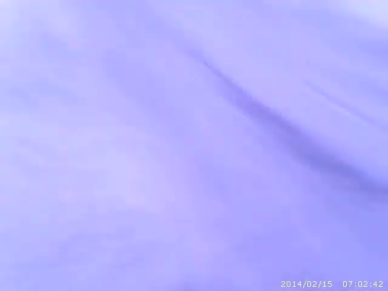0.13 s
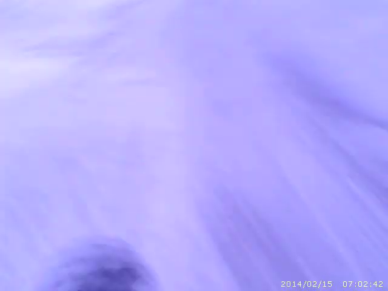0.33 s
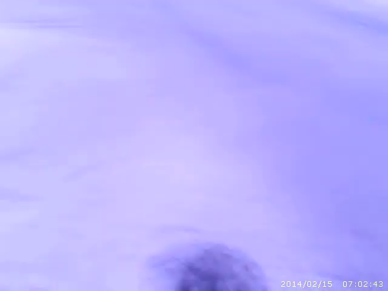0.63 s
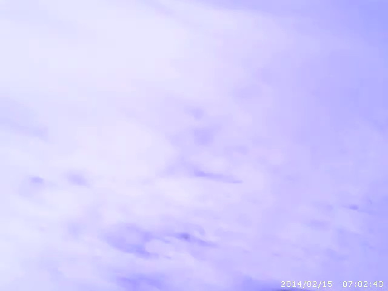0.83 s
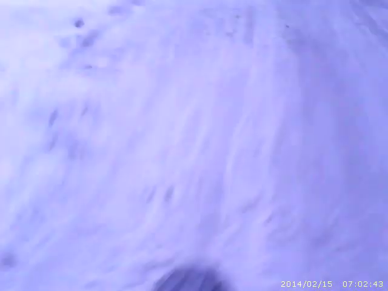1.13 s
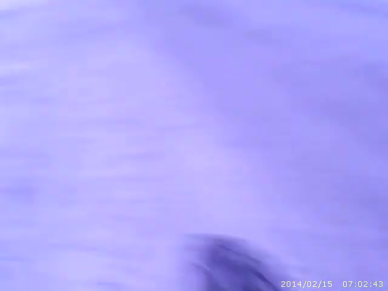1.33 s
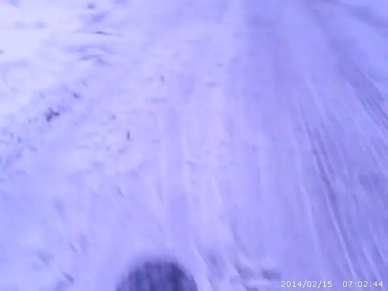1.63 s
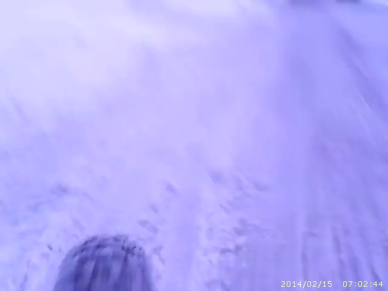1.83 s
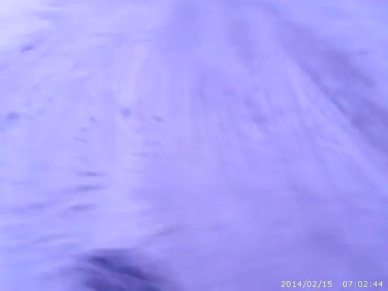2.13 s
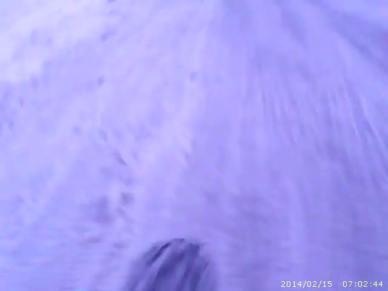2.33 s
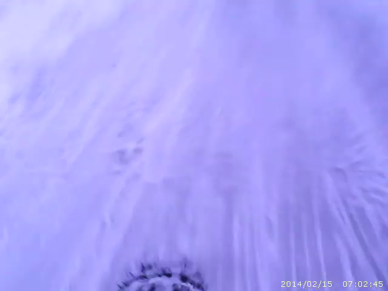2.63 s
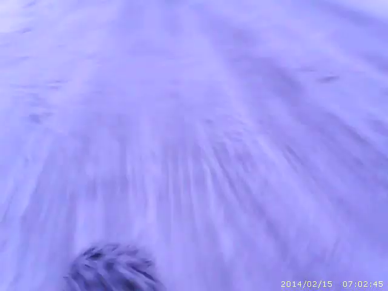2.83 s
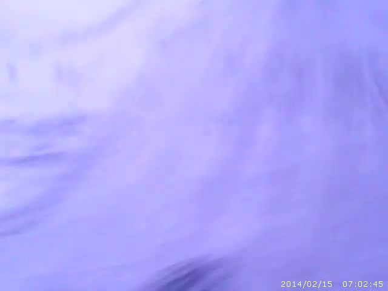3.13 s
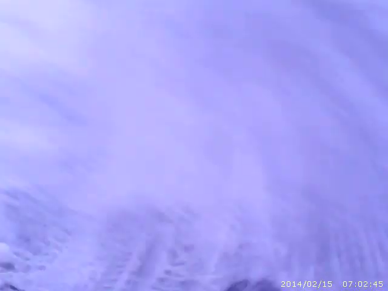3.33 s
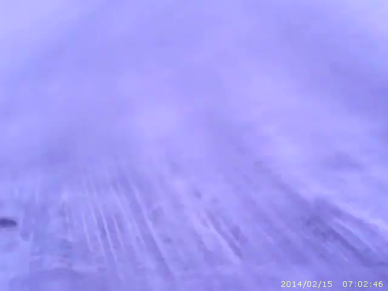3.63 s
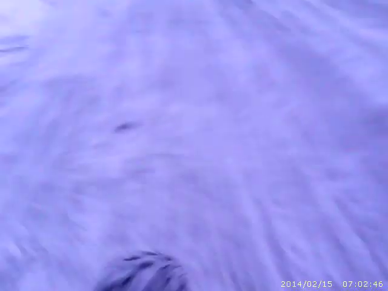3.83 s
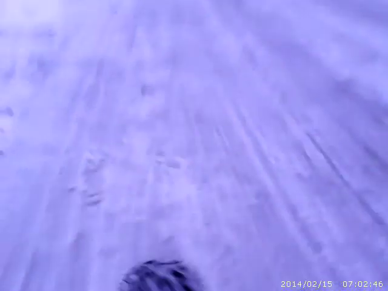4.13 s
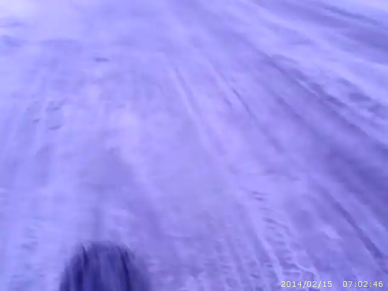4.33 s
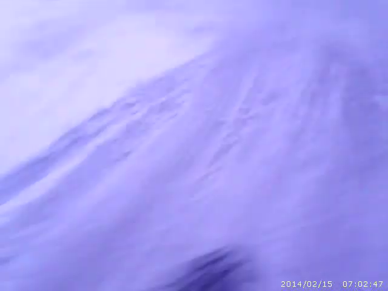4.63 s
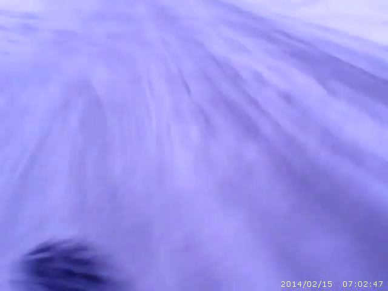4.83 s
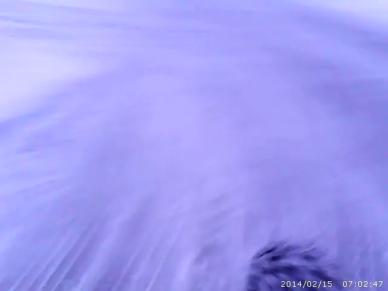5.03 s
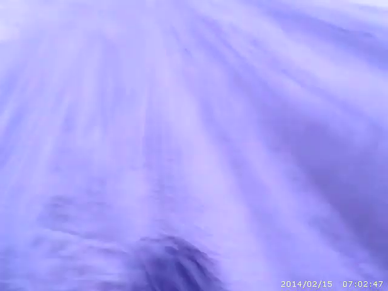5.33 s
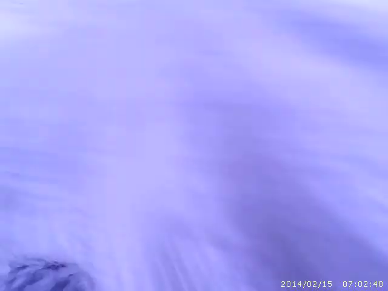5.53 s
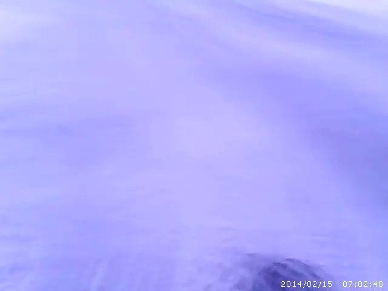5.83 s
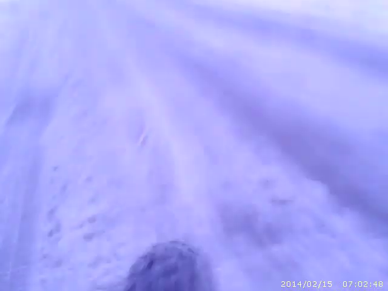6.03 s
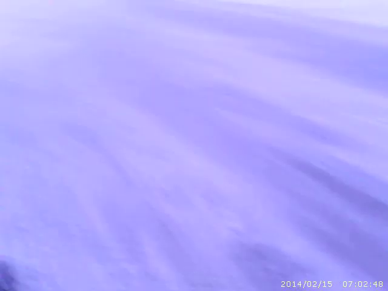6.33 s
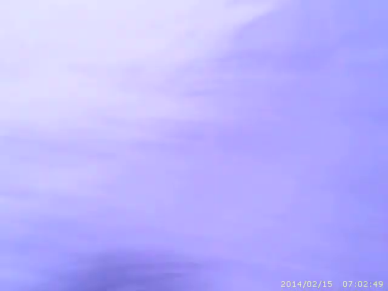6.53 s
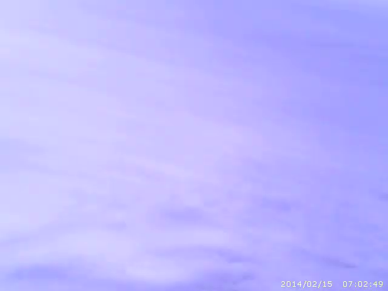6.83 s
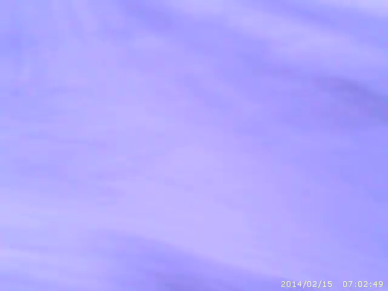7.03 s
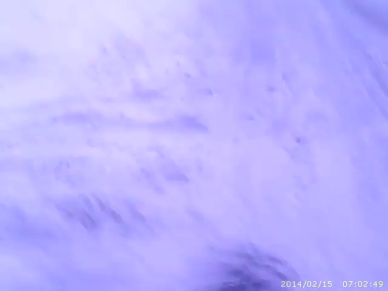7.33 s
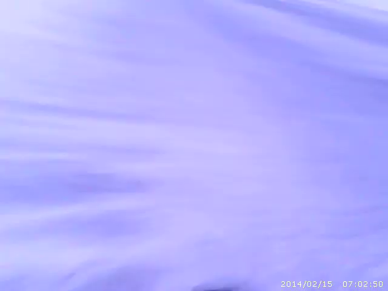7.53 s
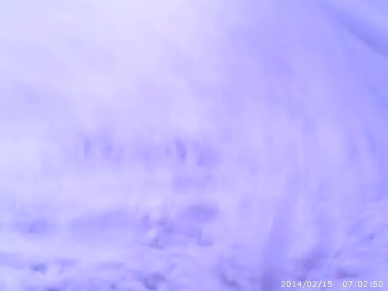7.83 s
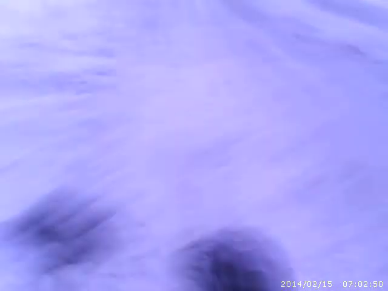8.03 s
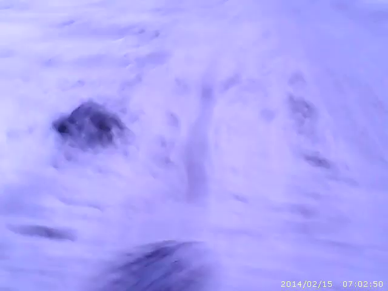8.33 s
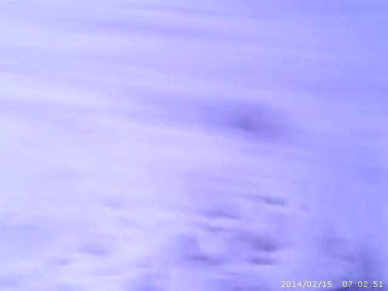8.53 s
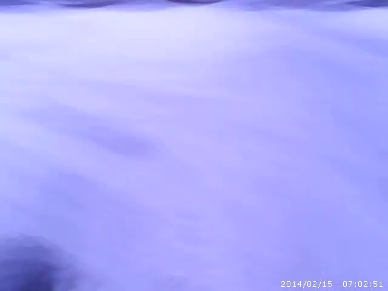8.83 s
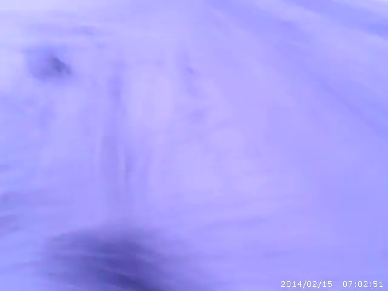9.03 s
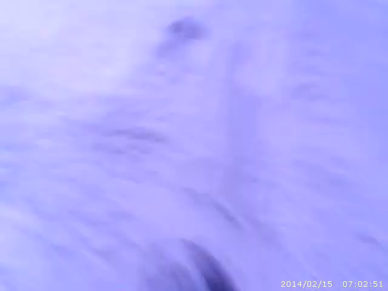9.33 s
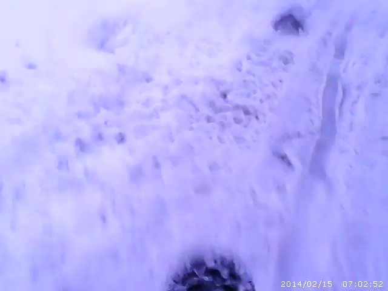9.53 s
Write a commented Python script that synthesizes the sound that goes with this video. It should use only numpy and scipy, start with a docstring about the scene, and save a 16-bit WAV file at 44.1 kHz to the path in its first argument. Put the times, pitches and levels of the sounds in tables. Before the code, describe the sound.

A bicycle rolls over crusty snow outdoors, heard from a small camera strapped above the wheel. Fine grains crackle and hiss through its plastic shell while low wind flutters. Hard, dry knocks and short speeding-up chatters of the loose mount come in irregular clusters, often distorting. Dull frame thuds join, gusts grow stronger past the middle, and crust occasionally breaks. The sound is boxy, narrow and mono.

```python
"""A knobby bicycle tyre rolls over crusty snow, heard by a small camera strapped above the wheel.
From the start snow grains snap and ring the camera shell, while wind buffets the microphone port.
At once the loose mount knocks, then chatters in a wobble that speeds up; soon dull thuds join in.
Later come gusts, then patches of crust that break in one go. The recorder passes only a narrow band
and clips the loud blows, which alone makes the highest treble."""
import sys
import numpy as np
from scipy import signal
from scipy.io import wavfile
from scipy.ndimage import uniform_filter1d

SR = 44100
rng = np.random.default_rng(int(sys.argv[2]) if len(sys.argv) > 2 else 0)


def persist_wave(psi):
    """Save psi, clipped to +-1, as 16-bit WAV."""
    counts = np.round(np.clip(psi, -1, 1) * 32767).astype(np.int16)
    wavfile.write(sys.argv[1], SR, np.atleast_2d(counts).T)


N = 426880  # length of the scene in samples

# ways the camera shell can ring: [f/Hz, time to fade 60 dB when knocked t/s, share of a knock level/dB,
# width of each of two filter passes under crunch f/Hz, share of the crunch level/dB]
SHELL_MODES = [(378, 0.012, -8.5, 1400, -7.5), (597, 0.0092, -9.5, 670, 8.5), (1260, 0.008, -17, 180, -8),
               (1719, 0.017, -6.5, 796, 3.5), (2093, 0.019, -7.5, 200, -22), (3146, 0.018, -14, 200, -6.5),
               (3446, 0.05, -16, 940, 9)]
# low, middle and upper shell modes: [above f/Hz, up to f/Hz]
MODE_GROUPS = [(0, 1000), (1000, 2600), (2600, 5000)]
# rolling crunch: [t/s, low modes level/dB, middle modes level/dB, upper modes level/dB]
ROLLING_LEVELS = [(0.0, -42, -30, -34), (0.24, -32.5, -28, -27.5), (0.65, -35, -25.5, -29.5),
                  (0.94, -35, -32.5, -30.5), (1.24, -31, -26, -28.5), (1.64, -36, -31, -35),
                  (1.86, -30.5, -28, -24.5), (2.18, -38, -28, -35.5), (2.48, -29, -27, -29.5),
                  (2.88, -37.5, -26, -36), (3.15, -32, -27, -28.5), (3.8, -31, -25, -29.5),
                  (4.04, -35, -26.5, -28.5), (4.26, -30, -20, -31), (4.53, -24, -24, -23),
                  (4.74, -41, -23.5, -34), (5.01, -27, -24, -30), (5.18, -34, -30.5, -30.5),
                  (5.44, -35, -31.5, -37.5), (5.69, -41, -35, -34), (6.01, -28, -26, -35),
                  (6.23, -25, -24.5, -26), (6.63, -54, -31, -31.5), (6.76, -30, -28, -25),
                  (7.33, -32, -27, -31.5), (7.68, -34.5, -32.5, -31), (8.22, -33.5, -29, -33),
                  (8.6, -35, -33, -30), (8.79, -33, -29.5, -28), (9.11, -34.5, -29.5, -31),
                  (9.68, -32, -32, -31)]
# slowly rising and falling wind: [t/s, level/dB]
BREEZE_LEVELS = [(0.0, -27.5), (1.64, -32.5), (1.83, -28.5), (2.69, -33), (3.8, -27), (4.31, -30.5),
                 (4.61, -22.5), (5.44, -29.5), (5.66, -14), (5.86, -20.5), (6.5, -25.5), (7.57, -28.5),
                 (7.71, -29.5), (8.3, -36.5), (8.82, -28.5), (9.16, -34), (9.68, -32)]
# blows of the loose mount: [t/s, blow level/dB, mount ring against the blow level/dB]
MOUNT_KNOCKS = [(0.004, 6.5, -12), (0.1025, -1, -11), (0.132, 6.5, -25), (0.207, 7, -14), (0.366, -6, -10),
                (0.4302, 4.5, -12), (0.4588, 0, -14), (0.4967, 4, -9.5), (0.5602, 3.5, -12),
                (0.578, -9, -8), (0.6488, -4.5, -12), (0.6795, -1, -10), (0.73, -2, -22), (0.753, 4, -18),
                (0.861, -2, -11.5), (1.142, 2.5, -15), (1.1614, 4, -16), (1.255, 2.5, -18),
                (1.292, 4.5, -16), (1.3408, -0.5, -15), (1.8112, 4, -17), (2.7818, -1, -13),
                (2.88, -12, 0.5), (2.8951, -5, -12), (2.9888, 1.5, -17), (3.0339, 4.5, -11),
                (3.1505, 4.5, -11), (3.196, 4.5, -23), (3.2332, 4.5, -6), (3.2749, 5.5, -9.5),
                (3.3791, 4, -12.5), (3.6016, 6.5, -17), (3.6434, 4.5, -9.5), (3.671, -6, -9),
                (3.687, 5, -15), (3.7274, 3.5, -11), (3.7415, -4, -24), (3.77, 2, -19), (3.8575, -2, -10.5),
                (4.3341, -2, -19), (4.5264, 3.5, -8), (4.592, 2, -34), (4.6582, -1.5, -10),
                (4.6922, -6, -3.5), (4.701, 3.5, -26), (4.756, -4.5, -11), (4.815, -15, -4),
                (4.866, -3.5, -8.5), (4.912, -6, -13), (4.934, 5, -14), (4.9502, 3.5, -10),
                (5.0037, 3.5, -5), (5.0467, 5.5, -12), (5.0807, 0, -16), (5.121, 3.5, -2), (5.176, -1, -15),
                (5.6322, 3, -23), (5.7509, 3, -14), (5.842, -5, -12), (5.8832, 3.5, -26),
                (5.899, -12.5, -2.5), (5.999, 5, -12.5), (6.0405, 3.5, -9.5), (6.192, -2.5, -4),
                (6.198, 2.5, -21), (6.251, -3.5, -6), (6.2607, 3, -2), (6.314, 5.5, -11), (6.3488, 0, -10),
                (6.3658, -12, 3.5), (6.368, -23, -2), (6.416, 5, -12), (6.429, 4, -10), (6.5322, -0.5, -25),
                (6.5915, 5.5, -8), (6.641, 1.5, -20), (6.6535, 3.5, -27), (6.7006, 8.5, -10),
                (6.722, 4, -8), (6.7717, 3.5, -15), (6.782, -0.5, -9), (6.8257, 2.5, -19.5),
                (6.864, 5, -23.7), (6.8716, -1, -8), (6.9147, 1, -14), (6.942, 3.5, -5), (7.087, 4, -32),
                (7.0994, -2, -5.5), (7.1072, 1, -17), (7.1618, 1, -8.5), (7.2144, 5, -15),
                (7.2354, 0.5, -11), (7.3312, 3.5, -12), (7.346, 2, -19), (7.4087, 3.5, -8.5),
                (7.5533, 1, -15.5), (7.781, 3.5, -13.5), (7.8465, 0, -17), (7.948, 2, -9.5),
                (8.097, 5.5, -13), (8.582, 7, -16), (8.6025, 2, -13), (8.652, 5.5, -4.5), (8.686, 5, -13),
                (8.715, -5, -12), (8.7256, 0.5, -40), (8.7595, 2.5, -13), (8.8037, 4.5, -11),
                (8.8186, 1, -9), (8.8276, 2, -19), (8.889, 4, -6.5), (9.0006, 2.5, -23), (9.031, 0.5, -15),
                (9.09, 3, -15), (9.1127, 4, -16), (9.137, -1, -17), (9.33, -9, -16), (9.384, 5, -21)]
# mount chatter: [moment it lets go t/s, glide up to the ring t/ms, level/dB]
MOUNT_CHATTER = [(0.028, 0.46, -7), (0.1877, 7.9, 0), (0.2638, 12, -1), (0.441, 1.4, -5),
                 (0.619, 2.3, -3.5), (0.8337, 5.2, 0), (1.2161, 4.7, -0.5), (1.8682, 1.5, -5),
                 (3.0765, 1.46, -3), (3.175, 1.9, -6), (3.2367, 5.3, -1), (3.2597, 3.2, -2.5),
                 (4.5064, 2.4, -6.5), (4.6269, 8.5, -2), (5.152, 1.27, -6), (6.2366, 4.4, -0.5),
                 (6.4631, 5.8, -3.5), (6.6749, 15.4, -4.5), (6.6915, 1.7, -5.5), (6.7447, 6.8, 0),
                 (6.7601, 2.4, -1), (6.835, 5, 0.5), (7.047, 8.1, -0.5), (7.0705, 0.49, -4),
                 (8.7042, 3.3, -2), (8.8691, 5.7, -1), (9.3166, 2.06, -1.5), (9.361, 1.4, -6),
                 (9.4611, 6, 0.5)]
# dull thuds through the frame: [middle t/s, pitch f/Hz (negative: down first), level before the fade/dB]
FRAME_THUDS = [(.367, 227, -9), (.4875, 298, -11.5), (1.645, 116, -11.5), (3.003, 167, -11),
               (3.348, 150, -12), (3.765, 106, -3.5), (4.28, 261, -11), (5.568, 168, 2), (6.124, 165, 2),
               (6.52, -150, -6), (6.552, 260, -10), (6.6392, -250, 2.5), (7.117, -300, -4.5),
               (7.198, 156, -10.5), (7.808, 160, -9), (8.129, 157, -9.5)]
# gusts on the microphone port: [t/s, length t/s, level/dB]
WIND_GUSTS = [(2.658, 0.045, -18.5), (3.307, 0.14, -31), (3.736, 0.065, -17), (4.436, 0.063, -21),
              (4.556, 0.097, -13.5), (4.665, 0.04, -17.5), (4.858, 0.14, -23.5), (5.503, 0.14, -14.5),
              (5.684, 0.14, -10.5), (5.96, 0.07, -18), (6.357, 0.028, -13.5), (6.526, 0.028, -21),
              (6.642, 0.015, -9), (6.865, 0.016, -9.5), (6.971, 0.015, -22), (7.915, 0.064, -22.5)]
# crust breaking in one go under the tyre: [t/s, length t/s, level/dB]
CRUST_BREAKS = [(3.651, 0.0088, -23), (4.811, .016, -20.5), (6.048, 0.019, -17.5), (9.466, 0.032, -21)]

DETUNE, SCATTER_DB = 0.045, 2  # random spread of pitch (as a fraction) and of level
RING_HZ = 1256  # the mount's own ring


def undb(db):
    """Decibels to gain."""
    return 10 ** (np.asarray(db) / 20)


def unit(x):
    """Scale to an average power (rms) of 1."""
    return x / np.sqrt(np.mean(x ** 2))


def band(x, hz, width):
    """Two-pole resonance, gain 1 at the centre."""
    return signal.lfilter(*signal.iirpeak(hz, hz / width, fs=SR), x)


def walk(rate_hz):
    """Random levels, each held for 1 / rate_hz seconds, then smoothed twice; spread near 1."""
    hold = max(int(SR / rate_hz), 1)
    steps = rng.standard_normal(N // 100)[np.arange(N) // hold]
    smooth = uniform_filter1d(uniform_filter1d(steps, hold), hold)
    return 1.435 * smooth  # makes up for the spread lost in smoothing


def add(out, s, x):
    """Mix a short sound in at time s."""
    i = int(s * SR)
    out[i:i + len(x)] += x[:len(out) - i]


def swells(table, edge_s):
    """Each row swells, holds and falls away with the same soft edge."""
    t = np.arange(N) / SR
    total = np.zeros(N)
    for s, length, db in table:
        to_nearest_end = np.minimum(t - s, s + length - t)
        total += undb(db) * np.clip(to_nearest_end / edge_s + 0.5, 0, 1) ** 2
    return total


def snow_in_shell(snaps_per_s=1000, spread_db=4, biggest_db=13, hiss_db=-3, lumpy_db=2.04):
    """Snow grains snap at random, mostly small, over hissing powder, in lumps; all ring the shell."""
    when, how_big, which_way = rng.random((3, N))
    size_db = np.minimum(-spread_db * np.log(1 - how_big), biggest_db)
    snaps = (when < snaps_per_s / SR) * undb(size_db) * np.sign(which_way - 0.5)
    grains = unit(snaps) + undb(hiss_db) * rng.standard_normal(N)
    grains *= undb(lumpy_db * walk(90))
    groups = [np.zeros(N) for _ in MODE_GROUPS]
    for k, (hz, _, _, width, db) in enumerate(SHELL_MODES):
        rung = band(band(grains, hz, width), hz, width)
        sense = (-1) ** k  # neighbouring modes swing in opposite senses
        rung *= sense * undb(db + 0.66 * walk(10))
        for group, (lo, hi) in zip(groups, MODE_GROUPS):
            if lo < hz <= hi:
                group += rung
    return [unit(group) for group in groups]


def rolling_crunch(groups):
    """The rolling tyre drives the low, middle and upper shell modes by changing amounts."""
    t = np.arange(N) / SR
    times, *levels_db = np.transpose(ROLLING_LEVELS)
    return sum(undb(np.interp(t, times, db)) * x for db, x in zip(levels_db, groups))


def wind(gust_db=3, shove_db=-8, peaky=0.27):
    """Eddies buffet the port: low, lumpy pressure with pointed crests and a slower shove beneath."""
    slope = signal.butter(2, 284, fs=SR, output="sos")  # Hz
    port = signal.butter(1, 62, "high", fs=SR, output="sos")  # Hz
    eddies = unit(signal.sosfilt(slope, rng.standard_normal(N)))
    pointed = eddies + peaky * (eddies ** 2 - 1)
    lumpy = pointed * undb(gust_db * walk(35))
    shove = unit(band(rng.standard_normal(N), 48, 39))
    pressure = unit(signal.sosfilt(port, lumpy)) + undb(shove_db) * shove
    breeze = undb(np.interp(np.arange(N) / SR, *np.transpose(BREEZE_LEVELS)))
    gusts = swells(WIND_GUSTS, edge_s=0.0068)
    return np.hypot(breeze, gusts) * pressure  # the powers of breeze and gusts add


def knocks(rise_s=0.0001, rattle_db=-15, rattle_s=0.006):
    """Each blow rings the shell a little differently; the mount ring swells behind it and stops."""
    peak_s, ring_rise_s, ring_fall_s = 0.0037, 0.0017, 0.0028
    free_s, free_s_per_db, choke_s, choked_db = 0.003, 0.00015, 0.0006, -17
    out, t = np.zeros(N), np.arange(int(0.064 * SR)) / SR
    hz, t60, db = np.transpose(SHELL_MODES)[:3, :, None]
    chance = rng.standard_normal((len(MOUNT_KNOCKS), 3, len(SHELL_MODES), 1))
    grit = unit(band(rng.standard_normal(N), 1700, 2800))
    swell = np.exp(-((t - peak_s) / np.where(t < peak_s, ring_rise_s, ring_fall_s)) ** 2)
    usual = np.sqrt(np.sum(undb(db) ** 2))
    for (s, blow_db, ring_db), (tune, size, turn) in zip(MOUNT_KNOCKS, chance):
        share = undb(db + SCATTER_DB * size)
        share *= usual / np.sqrt(np.sum(share ** 2))  # scatter the modes, keep their total
        swing = np.sin(2 * np.pi * (hz * (1 + DETUNE * tune) * t + turn))
        shell = (share * swing * 1000 ** (-t / t60)).sum(axis=0)
        ring_hz = RING_HZ * (1 + DETUNE / 2 * tune[0])
        ring = undb(ring_db) * np.sin(2 * np.pi * ring_hz * t) * swell
        # the parts fly apart and ring freely, then close and choke the shell
        closed = np.clip((t - free_s - free_s_per_db * blow_db) / choke_s, 0, 1)
        choke = undb(choked_db * closed)
        # loose parts keep ticking for a moment
        rattle = undb(rattle_db + SCATTER_DB * size[0]) * grit[int(s * SR):][:len(t)]
        rattle = rattle * np.exp(-t / rattle_s)
        onset = 1 - np.exp(-t / rise_s)
        add(out, s, undb(blow_db) * onset * (choke * shell + ring + rattle))
    return out


def chatter(lift=1.0, lift_ms=1.0, hold=0.51, longest_ms=11.1, fade_ms=4, overtone_db=-8,
            scrape_db=-10, lean=0.23):
    """The mount is pushed over, lets go and wobbles ever faster up to its ring."""
    deepest_drop_hz, half_drop_ms = 810, 1.92  # lowest start under the ring; glide reaching half of it
    out, ms = np.zeros(N), 1000 * np.arange(-int(0.0044 * SR), int(0.04 * SR)) / SR
    before, after, free = np.minimum(ms, 0), np.maximum(ms, 0), ms >= 0
    push = lift * np.exp(before / lift_ms) * (1 - np.exp(before / 0.077))
    grit, waver = unit(band(rng.standard_normal(N), 2700, 3000)), walk(400)
    for s, glide_ms, db in MOUNT_CHATTER:
        here = slice(int(s * SR), int(s * SR) + len(ms))
        # a longer glide starts further under the ring
        drop_hz = deepest_drop_hz * glide_ms / (glide_ms + half_drop_ms)
        hz = RING_HZ - drop_hz * np.clip(1 - after / glide_ms, 0, 1)
        hz *= 1 + DETUNE * waver[here]
        phase = 2 * np.pi * np.cumsum(hz * free) / SR
        fade_from_ms = min(hold * glide_ms, longest_ms)
        fade = np.exp(-(np.maximum(ms - fade_from_ms, 0) / fade_ms) ** 2)
        # a lopsided stop adds the second harmonic while the swing is wide, and leans it to one side
        lopsided = undb(overtone_db) * np.sin(2 * phase) - lean * free
        # the parts scrape as they move
        scrape = undb(scrape_db) * grit[here] * free
        wobble = np.sin(phase) + fade * lopsided + scrape
        add(out, s + ms[0] / 1000, undb(db) * (push - fade * wobble))
    return out


def thuds():
    """The frame passes one soft swing per thud, up then down, or down first if the pitch is negative."""
    t = np.arange(-0.02 * SR, 0.02 * SR) / SR
    out = np.zeros(N)
    for s, hz, db in FRAME_THUDS:
        soft_fade = np.exp(-(2.45 * hz * t) ** 2)
        add(out, s + t[0], -undb(db) * np.sin(2 * np.pi * hz * t) * soft_fade)
    return out


def crust_breaks(groups):
    """Crust gives way under the tyre: a short burst of the snow sound in all shell modes."""
    return swells(CRUST_BREAKS, edge_s=0.0034) * unit(sum(groups))


def scene():
    """Add up tyre, wind, the loose mount and the frame, in one channel."""
    groups = snow_in_shell()
    snow = rolling_crunch(groups) + crust_breaks(groups)
    return (snow + wind() + knocks() + chatter() + thuds())[None, :]


def record(dry):
    """A narrow-band input stage, then hard clipping, a small offset and the top cut."""
    clip_level, offset = 0.71, -0.0045
    gentle = signal.butter(6, 3425, fs=SR, output="sos")  # Hz
    steep = signal.ellip(8, 0.2, 70, 4230, fs=SR, output="sos")  # ripple dB, stop dB, Hz
    top_cut = signal.ellip(10, 0.2, 80, 16400, fs=SR, output="sos")
    narrow = signal.sosfilt(steep, signal.sosfilt(gentle, dry))
    clipped = np.clip(narrow, -clip_level, clip_level) + offset
    return signal.sosfilt(top_cut, clipped)


dry = scene()
out = record(dry)
persist_wave(out)
```